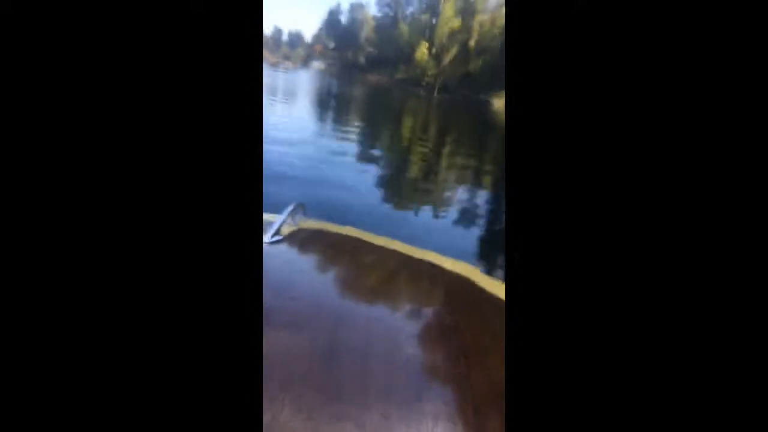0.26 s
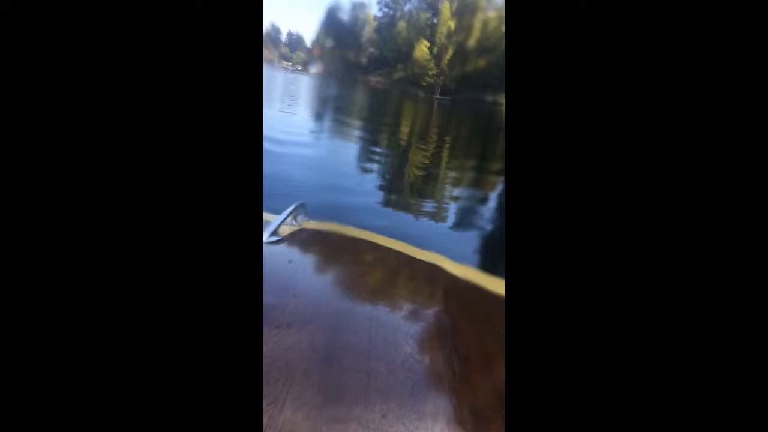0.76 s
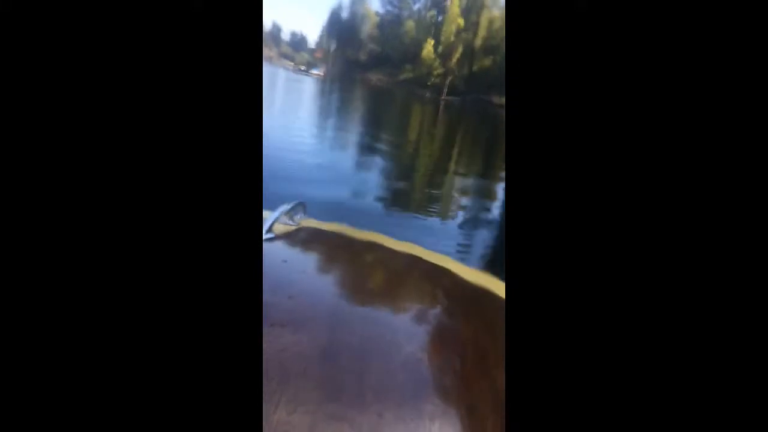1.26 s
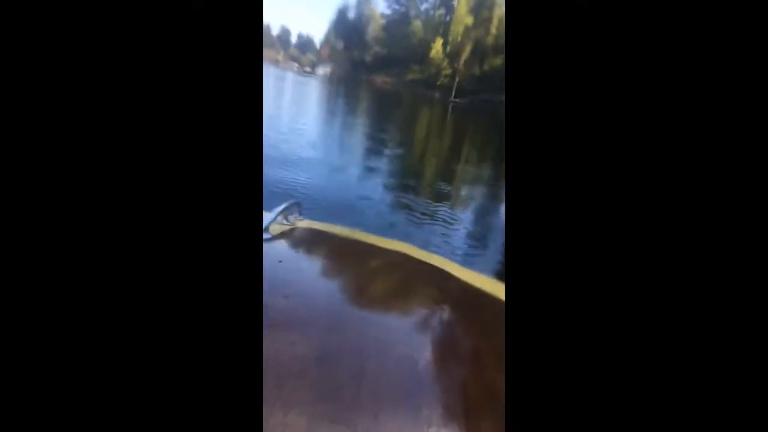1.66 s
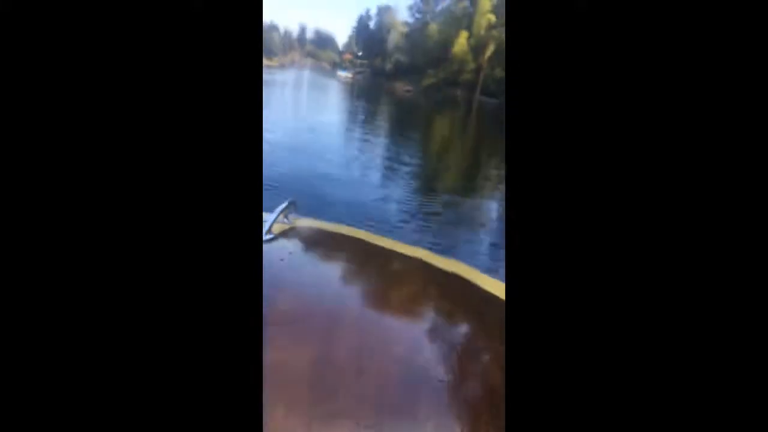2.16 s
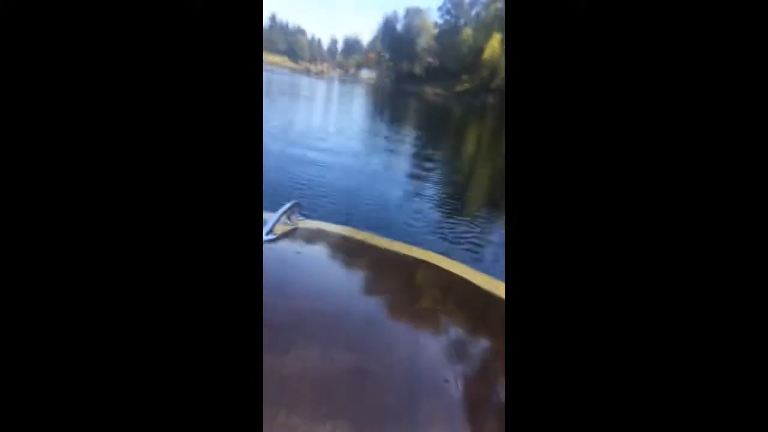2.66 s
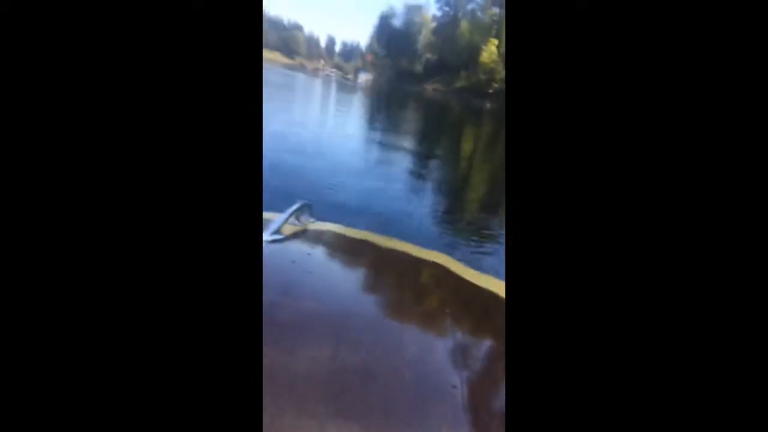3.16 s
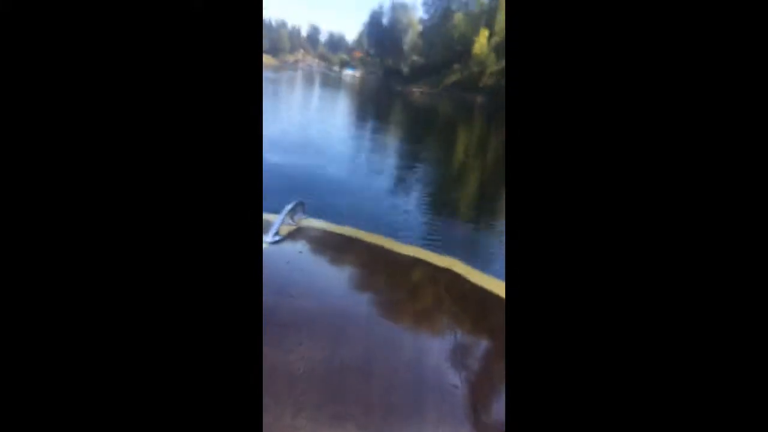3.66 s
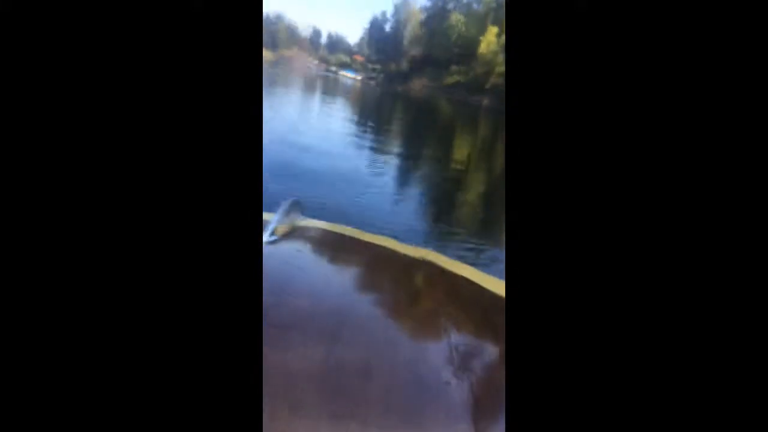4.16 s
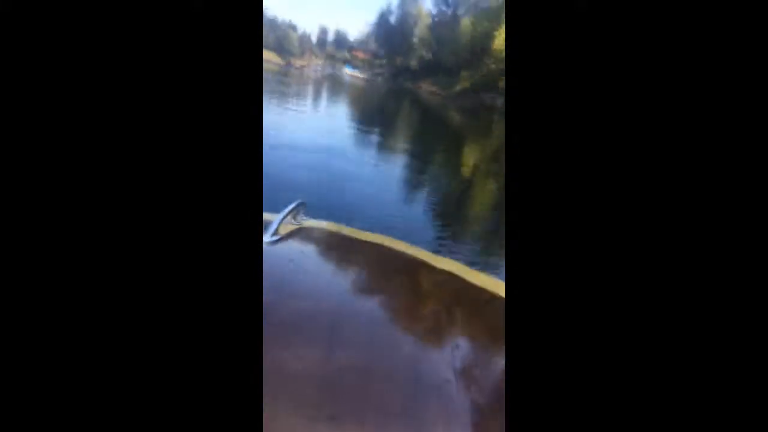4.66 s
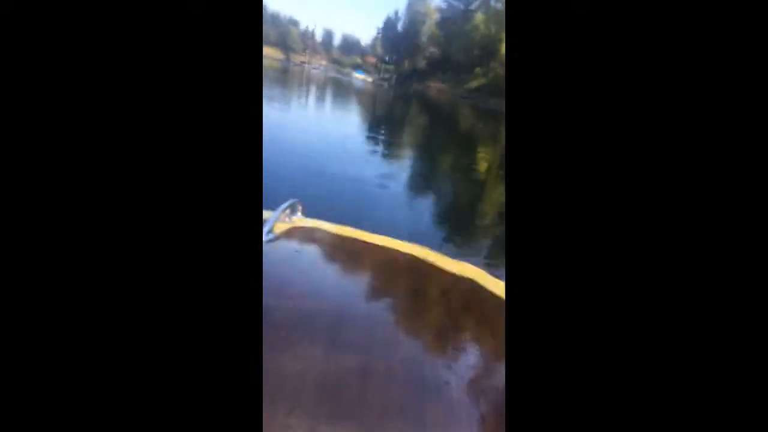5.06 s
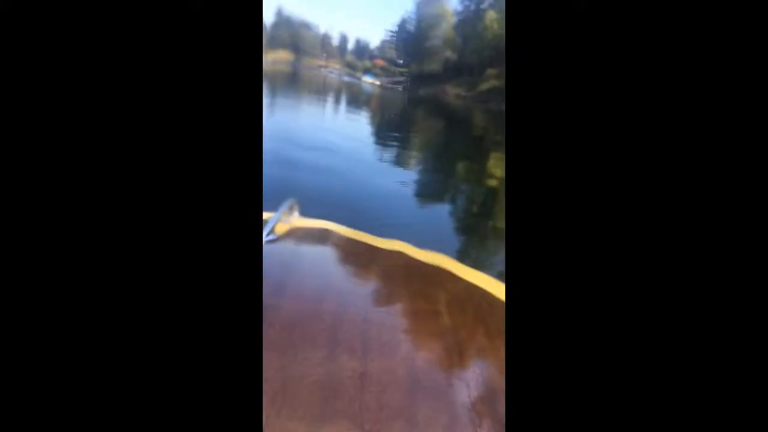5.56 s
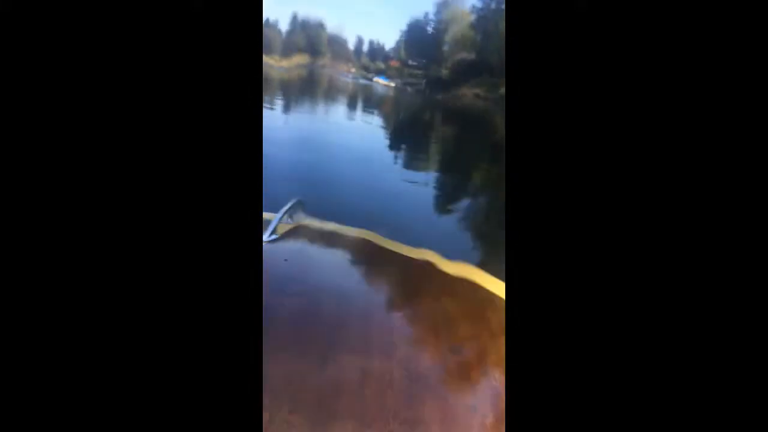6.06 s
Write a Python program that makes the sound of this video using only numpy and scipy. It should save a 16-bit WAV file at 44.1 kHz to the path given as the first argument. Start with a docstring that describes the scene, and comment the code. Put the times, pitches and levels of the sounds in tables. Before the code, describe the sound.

Steady blaring hum of a small boat's two-cylinder outboard, with stuttering firings early on, faint metallic rattle and a thin hiss of gas and spray.

```python
"""A two-cylinder two-stroke outboard drives a small wooden boat along a calm river, heard from the cockpit.
Two firings a crank turn boom through exhaust and hull as wavering notes, and uneven burns add filtered rumble.
Pistons and reeds tick in short noise bursts, and loose metal rings as noise through narrow resonances.
Gas puffs with the firings and spray flickers, both as filtered noise; the phone limits the loudest peaks."""
import sys
import numpy as np
from scipy import signal
from scipy.fft import rfft, irfft, next_fast_len
from scipy.io import wavfile
from scipy.ndimage import uniform_filter1d, minimum_filter1d

SR = 44100
rng = np.random.default_rng(int(sys.argv[2]) if len(sys.argv) > 2 else 0)


def wav_record(signal):
    """Record a signal, one row per channel, as 16-bit PCM in the file named by sys.argv[1]."""
    frames = np.transpose(np.atleast_2d(signal))
    bounded = np.clip(frames, -1, 1)
    # unit amplitude maps onto the largest positive 16-bit level
    quanta = np.round(bounded * 32767).astype(np.int16)
    wavfile.write(sys.argv[1], SR, quanta)


N = 278271

# How the engine runs, before the small wavers: (time [s], crank speed [Hz], firing note [dB],
# once-a-turn note [dB])
ENGINE_RUN = [(0, 79.82, -12, -23), (.4, 79.94, -9.5, -22), (.8, 80.43, -11, -25),
              (1.45, 80.18, -12.5, -23.5), (1.95, 79.64, -8, -19), (2.2, 79.16, -11.5, -22.5),
              (2.5, 78.48, -10.5, -19.5), (2.74, 78.8, -9.5, -20), (2.95, 81, -10, -21),
              (3.3, 79.83, -11, -23), (3.55, 78.9, -8, -23), (3.95, 77.63, -9.5, -21),
              (4.3, 77.2, -9.5, -24.5), (4.95, 76.8, -8.5, -15), (5.15, 76.16, -10, -19.5),
              (5.5, 75.95, -9.5, -16), (5.9, 76.47, -10.5, -21), (6.31, 76.22, -9.5, -17.5)]
# How far the engine is into its loaded, steadier running: (time [s], share [0-1])
ENGINE_LOAD = [(0, 0), (3.0, 0.12), (3.8, 0.97), (6.31, 0.98)]
# Notes at multiples of the crank speed, relative to NOTE_BASE_DB; half multiples come from
# strong and weak turns alternating: (multiple, level running light [dB], level loaded [dB])
EXHAUST_NOTES = [(.5, -29.5, -21.5), (1.5, -16, -17.5), (2.5, -14.5, -17), (3, -23.5, -15.5),
                 (3.5, -22.5, -26.5), (4, -26, -15), (5, -24.5, -17), (5.5, -37.5, -34.5), (6, -22, -22),
                 (6.5, -30, -43), (7, -37.5, -25.5), (7.5, -28.5, -30.5), (8, -24, -20.5), (8.5, -29, -30),
                 (9, -40, -40.5), (9.5, -38, -33.5), (10, -36, -44.5), (10.5, -33.5, -41.5),
                 (11, -51, -36.5), (11.5, -36, -46), (12, -47.5, -32), (13, -47, -32.5), (13.5, -36, -43.5),
                 (14, -47, -34.5), (14.5, -35.5, -38), (15, -38.5, -36.5), (16, -33.5, -43.5),
                 (17, -44, -34.5), (18, -43, -40.5), (19, -40.5, -44)]
# The upper exhaust notes swell and sink: (time [s], multiples 3.5 to below 5 [dB],
# 5 to below 7 [dB], 7 and up [dB])
NOTE_SWELL = [(0, 2.5, 1.5, -3.5), (1, -9.5, -0.9, -4.5), (1.8, 0.5, -1.5, -2.7), (2.5, -0.5, -2.8, -2),
              (3, 4, 0.5, -1.5), (3.7, -3, -3, -5), (5, 3, 1, -0.7), (5.45, 0.5, -5.5, -0.5),
              (6.31, 0.5, 0, -1.5)]
# A few weak burns let the firing note drop: (middle [s], depth [dB], length at half depth [s])
WEAK_BURNS = [(0.013, 13, 0.044), (0.157, 1, 0.029), (.28, 4.5, .05), (0.557, 7, .03), (0.623, 6, 0.038),
              (.67, 13, 0.027), (0.734, 22, 0.055), (1.16, 12, 0.03), (1.42, 0, .04), (1.493, 6, 0.031),
              (1.592, 12, 0.025), (1.875, 7, 0.022), (2.18, 1.5, .05), (2.358, 1, 0.034), (2.784, 12, .05),
              (2.851, 7.5, 0.063), (3.253, 4, 0.035), (3.702, 9, .04), (4.637, 2.5, .04), (5.099, 5, .04)]
# How an uneven burn rings exhaust and hull: (frequency [Hz], relative gain [dB])
HULL_RING = [(15, -61.5), (25, -33), (62, -11.5), (109, -5.5), (156, -5), (178, -3.5), (204, -10),
             (355, -18), (389, -17.5), (509, -25.5), (619, -29.5), (775, -37), (900, -36.5), (1170, -70),
             (1980, -120)]
# When pistons and reeds tick: (share of a turn after the start of a turn [0-1], relative size [dB])
TICK_ANGLES = [(0.32, 7), (.17, -13), (.85, -7)]
# Tone of the ticks: (frequency [Hz], relative gain [dB])
TICK_TONE = [(2000, -30), (5000, -13), (9000, 3), (15000, -3.5)]
# Ringing of block and cowl: (frequency [Hz], width [Hz], mean level [dB])
BLOCK_RING = [(1068, 110, -45), (1480, 85, -50), (1670, 110, -49.5), (2270, 68, -57.5), (3206, 60, -58),
              (3440, 69, -58), (3680, 170, -59.5), (3995, 59, -58), (5355, 59, -65), (7560, 100, -66.5)]
# Loudness of the hiss: (time [s], gas [dB], spray [dB])
HISS_LEVEL = [(0, -33, -44.5), (.9, -32, -41.5), (1.6, -32, -43), (2.2, -35.5, -45), (2.9, -31, -45.5),
              (3.55, -34, -43), (4.5, -34, -45), (5.3, -34, -42), (5.95, -34.8, -45), (6.31, -33, -45)]
# Tone of gas and spray: (frequency [Hz], relative gain [dB])
HISS_TONE = [(290, -29.5), (500, -8), (569, -6), (619, -8.5), (746, -13.5), (1050, -14.5), (1380, -17),
             (1640, -16), (2310, -20), (2780, -24.5), (3200, -21.5), (3910, -22.5), (4850, -25.5),
             (14600, -36.5), (15200, -43)]

NOTE_BASE_DB = -11.0
CRANK_WOBBLE = .0008  # typical share of the speed
TURN_FLUTTER_DB, TURN_FLUTTER_PER_S = 2.5, 18  # the two cylinders match now better, now worse
ROUGH_LIGHT_DB, ROUGH_LOADED_DB, ROUGH_SWAY_DB = -20, -21.5, 1  # uneven burns
TICK_DB, TICK_FLICKER_DB = -60, 1
CEILING = .715  # peak the limiter aims for, where full scale is 1
TOP_HZ = 15310


def undb(db):
    """Turn dB into a gain."""
    return 10 ** (np.asarray(db) / 20)


def level(x, db):
    """Scale a sound to an rms (average) level in dB."""
    return x * undb(db) / np.sqrt(np.mean(x ** 2))


def curves(table):
    """Join the points of a (time, value, ..) table with straight lines, one value a sample."""
    s, *columns = np.transpose(table)
    return [np.interp(np.arange(N) / SR, s, column) for column in columns]


def walk(rate):
    """Random levels drawn rate times a second, joined smoothly, with a spread of 1."""
    knots = uniform_filter1d(np.repeat(rng.standard_normal(400), 8), size=8)
    knots = uniform_filter1d(knots, size=8)
    path = np.interp(np.arange(N) * rate * 8 / SR, np.arange(len(knots)), knots)
    return path / np.std(path)


def colour(x, points):
    """Filter to the given (Hz, dB) gain; like a real resonance, it only rings after its cause."""
    size = 2 * next_fast_len(N // 2 + SR // 4)
    hz, db = np.transpose(points)
    f = np.maximum(np.arange(size // 2 + 1) * SR / size, 1)
    gain_db = np.interp(np.log(f), np.log(hz), db)
    # folding the cepstrum (the log gain turned back into time) moves all the ringing after its cause
    cepstrum = irfft(np.log(undb(gain_db)))
    cepstrum[1:size // 2] *= 2
    cepstrum[size // 2 + 1:] = 0
    response = np.exp(rfft(cepstrum))
    return irfft(rfft(x, size) * response, size)[:N]


def notes(turns, firing_db, turn_db, load):
    """The repeating exhaust pulses make notes at multiples of the crank speed, each wavering."""
    swell = curves(NOTE_SWELL)
    angle = 2 * np.pi * turns
    firing_gain = undb(firing_db + 1.1 * (1.3 - load) * walk(24))
    turn_phase = .1 + 1.3 * (1 - load) + .35 * walk(8)
    out = firing_gain * np.cos(2 * angle) + undb(turn_db) * np.cos(angle + turn_phase)
    steady = 1 - .55 * load  # load calms the wavering
    beat = 1.39 * walk(12)  # where in two turns the weak burn falls; it dents the firing note from both sides
    for k, light_db, loaded_db in EXHAUST_NOTES:
        half = k % 1 > 0
        mean_db = NOTE_BASE_DB + (1 - load) * light_db + load * loaded_db
        if k > 3:
            mean_db = mean_db + swell[int(np.clip((k - 3) // 2, 0, 2))]
        # the strong-weak pattern slips, so half multiples wander further
        if half:
            slip = steady * (np.sign(k - 2) * beat + .15 * abs(k - 2) * walk(13))
        else:
            slip = steady * (.1 + .016 * k) * walk(7)
        waver_db = (3.2 if half else 1.3) * steady * walk(11)
        out = out + undb(mean_db + waver_db) * np.cos(k * angle + 0.46 * (k - 2) + slip)
    return np.sqrt(2) * out  # a cosine of this height has an rms of 1


def stumbles():
    """Weak burns take dB off the firing note: one smooth dent for each stumble."""
    t = np.arange(N) / SR
    loss_db = 0
    for middle, depth_db, length in WEAK_BURNS:
        spread = length / 2.355  # from the width at half depth
        loss_db = loss_db + depth_db * np.exp(-.5 * ((t - middle) / spread) ** 2)
    return loss_db


def burns(turns):
    """Each firing is stronger or weaker than the mean, and the hull shakes on between them."""
    at = np.flatnonzero(np.diff(np.floor(2 * turns)))  # two firings a turn
    kicks = np.zeros(N)
    kicks[at] = rng.standard_normal(N // 100)[:len(at)]
    shaking = level(rng.standard_normal(N), 4.5)
    return level(colour(level(kicks, 0) + shaking, HULL_RING), 0)


def ticks(turns):
    """Short dry ticks of pistons and reeds, uneven in size, near fixed crank angles."""
    hits = np.zeros(N)
    for angle, db in TICK_ANGLES:
        at = np.flatnonzero(np.diff(np.floor(turns - angle)))
        late, size = rng.standard_normal((N // 100, 2))[:len(at)].T
        place = np.clip(at + (16 * late).astype(int), 0, N - 1)
        hits[place] = undb(db + 2.5 * size)
    fade = np.exp(-np.arange(96) / 18)  # in samples
    bursts = signal.fftconvolve(hits, fade)[:N] * rng.standard_normal(N)
    return level(colour(bursts, TICK_TONE), 0)


def rattle():
    """Loose metal keeps the block's resonances ringing, each swelling on its own."""
    out = 0
    for hz, width, db in BLOCK_RING:
        b, a = signal.iirpeak(hz, hz / width, fs=SR)
        ring = signal.lfilter(b, a, rng.standard_normal(N))
        out = out + level(ring, db) * undb(2.2 * walk(7))
    return out


def hiss(turns, gas_db, spray_db):
    """Gas puffs with the firings, one cylinder harder; above it spray that flickers."""
    angle = 2 * np.pi * turns
    puff = 1 + 0.086 * np.cos(2 * angle + 0.43) + 0.075 * np.cos(angle - 2.1)
    low = colour(undb(0.52 * walk(20)) * puff * rng.standard_normal(N), HISS_TONE)
    high = colour(undb(1.5 * walk(7.3)) * rng.standard_normal(N), HISS_TONE)
    split = signal.butter(2, 2700, fs=SR, output="sos")
    gas = signal.sosfilt(split, low)
    spray = high - signal.sosfilt(split, high)
    return undb(gas_db) * level(gas, 0) + undb(spray_db) * level(spray, 0)


def scene():
    """One crank angle times the notes, burns, ticks and gas; rattle and spray run free of it."""
    hz, firing_db, turn_db = curves(ENGINE_RUN)
    gas_db, spray_db = curves(HISS_LEVEL)
    load = np.clip(curves(ENGINE_LOAD)[0], 0, 1)
    turns = np.cumsum(hz * (1 + CRANK_WOBBLE * walk(18))) / SR
    turn_db = turn_db + TURN_FLUTTER_DB * walk(TURN_FLUTTER_PER_S)
    rough_db = (1 - load) * ROUGH_LIGHT_DB + load * ROUGH_LOADED_DB
    rough_db = rough_db + ROUGH_SWAY_DB * walk(3.2)
    engine = notes(turns, firing_db - stumbles(), turn_db, load) + undb(rough_db) * burns(turns)
    tick_gain = undb(TICK_DB + TICK_FLICKER_DB * walk(7))
    metal = rattle() + tick_gain * ticks(turns)
    return (engine + metal + hiss(turns, gas_db, spray_db))[None]


def record(dry):
    """The phone drops the deepest bass, a quick limiter holds the peaks, and the top is cut."""
    x = signal.sosfilt(signal.butter(1, 8, "high", fs=SR, output="sos"), dry)
    need = np.minimum(1, CEILING / (np.abs(x) + 1e-9))
    # hold the lowest gain nearby, then smooth it, each over 221 samples (5 ms)
    gain = uniform_filter1d(minimum_filter1d(need, size=221), size=221)
    top_cut = signal.ellip(12, .2, 80, TOP_HZ, fs=SR, output="sos")
    return signal.sosfilt(top_cut, x * gain)


dry = scene()
out = record(dry)
wav_record(out)
```